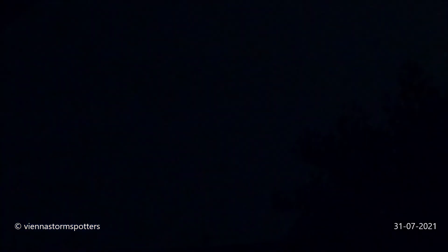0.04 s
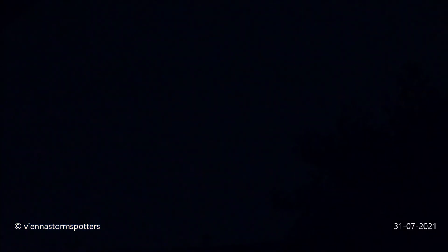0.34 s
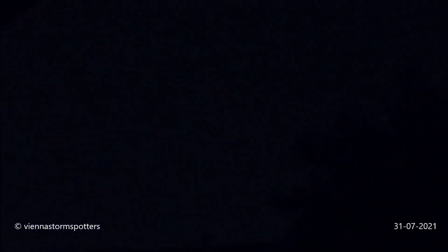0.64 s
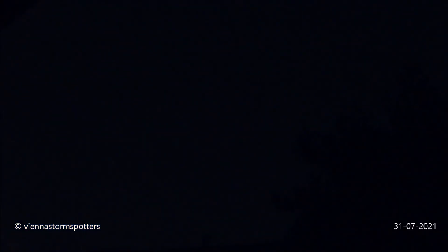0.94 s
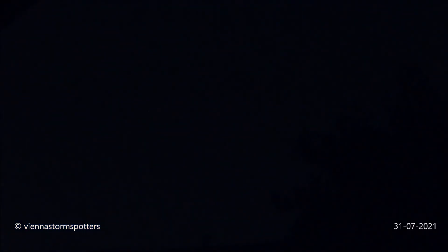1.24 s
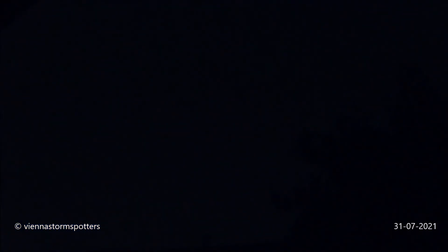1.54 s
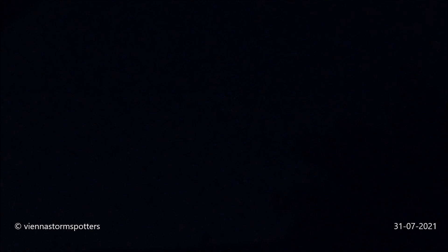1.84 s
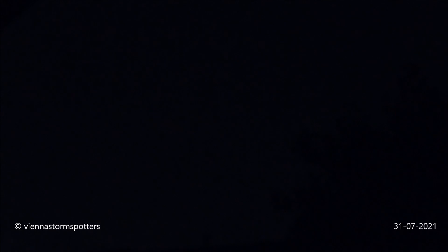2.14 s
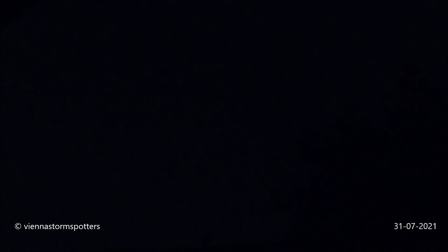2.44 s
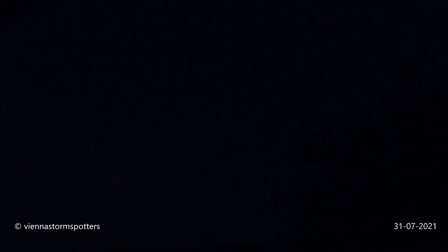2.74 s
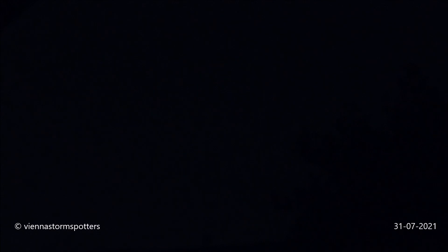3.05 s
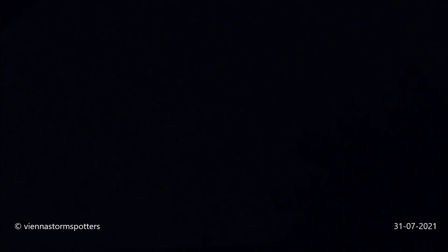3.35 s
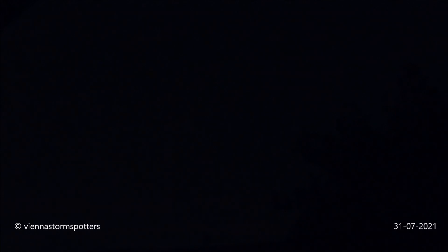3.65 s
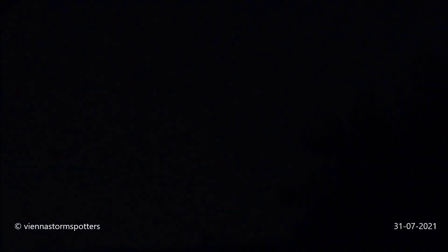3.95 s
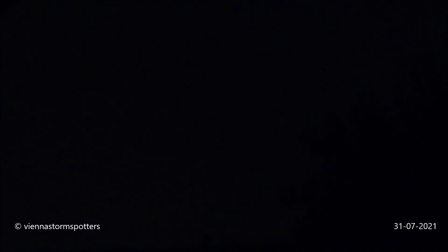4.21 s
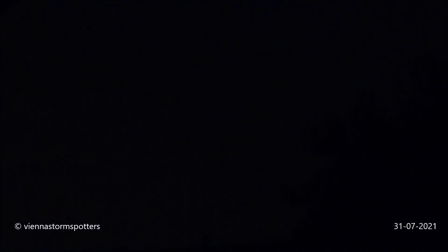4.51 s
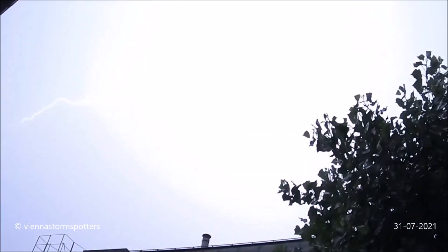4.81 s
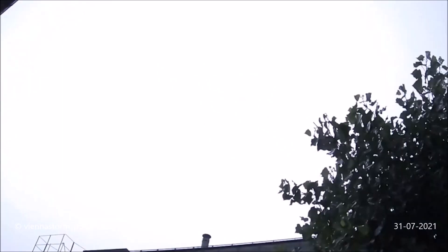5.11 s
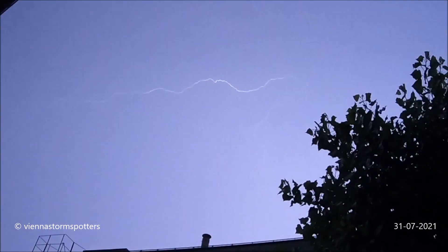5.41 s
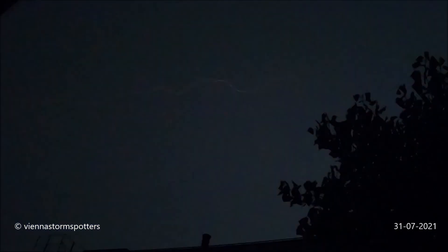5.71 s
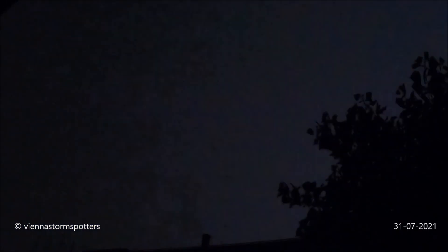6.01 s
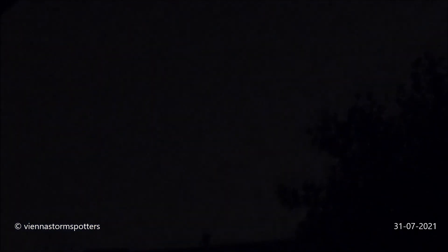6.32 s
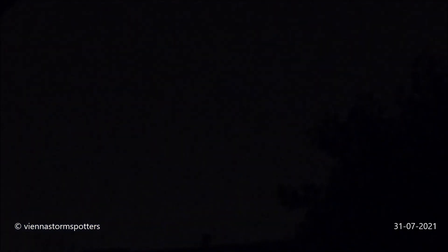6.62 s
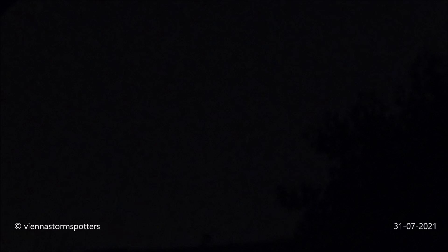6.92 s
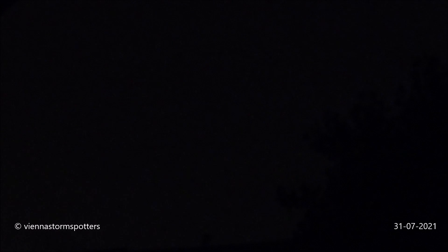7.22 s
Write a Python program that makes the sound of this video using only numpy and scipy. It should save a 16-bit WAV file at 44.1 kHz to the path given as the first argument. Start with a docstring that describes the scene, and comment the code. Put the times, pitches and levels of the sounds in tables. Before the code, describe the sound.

Steady rain hisses softly in a courtyard as a low rumble and two dull claps open. Dry cracks and a tearing rattle build into a very loud peal of thunder that rings between the house walls. The small stereo recorder clicks briefly with overload, dips in level and slowly recovers, while the thunder rolls on in deep, fading waves.

```python
"""Thunder over a courtyard at night, in steady rain, heard on a small two-microphone recorder.
A low rumble and two dull claps open. The nearest branches of the lightning crack and tear from about
1.5 s, the main channel arrives as a loud peal near 3 s, and its far parts roll on in waves.
Every bend of the channel sends one shock, and the house walls ring with them.
The recorder clicks with overload at the peal, turns itself down and slowly recovers."""
import sys
import numpy as np
from scipy import signal
from scipy.fft import rfft, irfft
from scipy.io import wavfile
from scipy.ndimage import uniform_filter1d

SR = 44100
rng = np.random.default_rng(int(sys.argv[2]) if len(sys.argv) > 2 else 0)


def output_pcm(signal):
    """Save a mono or channel-first signal as 16-bit PCM at the path in sys.argv[1].

    Samples are clipped to [-1, 1] before scaling.
    """
    pcm = np.clip(np.atleast_2d(signal).T, -1, 1) * 32767
    wavfile.write(sys.argv[1], SR, np.round(pcm).astype(np.int16))


N = 320250
TAPS = 16384  # length of the filters and echo tails
TIME = np.arange(N) / SR
HZ = np.maximum(np.arange(TAPS // 2 + 1) * SR / TAPS, 1)


def undb(db):
    """Decibels to gain."""
    return 10 ** (np.asarray(db) / 20)


def curve(table):
    """Gain over time from rows of time_s, level_db."""
    rows = np.array(table)
    return undb(np.interp(TIME, rows[:, 0], rows[:, 1]))


def spectrum(table, column=1):
    """Response in dB from one column of a table whose rows begin with frequency_hz."""
    rows = np.array(table)
    return np.interp(np.log(HZ), np.log(rows[:, 0]), rows[:, column])


def below(hz):
    """Steep low-pass response in dB."""
    return -10 * np.log10(1 + np.minimum(HZ / hz, 3) ** 12)


def above(hz):
    """Steep high-pass response in dB."""
    return -10 * np.log10(1 + np.minimum(hz / HZ, 3) ** 12)


def colour(x, response_db):
    """Causal filter: resonances ring after each blow and are already ringing at the start."""
    cepstrum = irfft(np.log(undb(response_db)))
    cepstrum[1:TAPS // 2] *= 2  # fold to minimum phase
    cepstrum[TAPS // 2 + 1:] = 0
    impulse = irfft(np.exp(rfft(cepstrum)))
    return signal.oaconvolve(np.pad(x, (TAPS - 1, 0), "wrap"), impulse, "valid")


def steady(x, span_s):
    """Hold the rms at 1 over span_s and keep the faster grain."""
    size = max(int(span_s * SR), 2)
    power = uniform_filter1d(uniform_filter1d(x ** 2, size), size)
    return x / np.sqrt(np.maximum(power, 1e-18))


def arrivals(per_s, spread_db):
    """Impulses at random moments; most are of like size, a few stray far from it."""
    hit = rng.random(N) < per_s / SR
    size = undb(spread_db * np.minimum(rng.exponential(size=N), 4))
    return hit * size * rng.choice([-1, 1], N)


def swarm(response_db, gain, per_s, spread_db, span_s):
    """Countless overlapping impulses: head-on in the first row, off the side walls in the second."""
    rows = [colour(arrivals(per_s, spread_db), response_db) for _ in range(2)]
    return gain * np.array([steady(row, span_s) for row in rows])


def rain():
    """A wash of distant drops on roofs and leaves, with a few ticks nearer the microphones."""
    # tone of the rain hiss, with the recorder's treble falling away above 10 kHz: frequency_hz, gain_db
    hiss_tone = [(60, 3.5), (250, -1), (450, -2.5), (650, 2.5), (1000, -1.5), (1600, -6.5), (2400, -11),
                 (3200, -15.5), (4500, -21), (7000, -24), (9000, -25.5), (10100, -27.5), (11400, -43.5),
                 (14000, -45.5), (16000, -71)]
    # the rain slowly thickens: time_s, level_db
    rainfall = [(0, -35.5), (2.5, -34.5), (4.5, -35), (6.3, -34), (7.26, -34)]
    tone, gain = spectrum(hiss_tone), curve(rainfall)
    wash = swarm(tone, gain, per_s=16000, spread_db=2, span_s=0.34)
    ticks = swarm(tone + above(3500), gain * undb(-33), per_s=270, spread_db=2.5, span_s=0.8)
    return wash + ticks


def yard():
    """Response in dB of the space between the house walls."""
    # resonances and dips: pitch_hz, width_hz, gain_db
    modes = [(50.3, 9.4, 14), (73.7, 7.5, 6.5), (93.7, 11, -3.5), (110.4, 6.7, 13.5), (135.5, 12.7, 8.5),
             (184.9, 46, 9.5), (224.3, 16.6, 9.5), (261.4, 21, 6.5), (330.3, 24, 3.5), (412.2, 9.8, 9),
             (455.7, 24, 6.5), (593.5, 48, 6), (738, 24, 1), (870, 7.7, -0.5), (970, 12, -1),
             (1313, 39, -3)]
    return sum(db * 2 ** -((2 * (HZ - hz) / width) ** 2) for hz, width, db in modes)


def far_tone():
    """Response in dB for a distant shock ringing in the yard: mostly bass."""
    # tone of the boom: frequency_hz, gain_db
    boom_tone = [(12, -25), (22, -1), (31, -27), (43, 0.5), (70, 4), (130, 1.5), (200, -1.5), (290, -5),
                 (390, -9), (600, -28), (1200, -68.5), (3000, -95.5)]
    return spectrum(boom_tone) + yard()


def near_tone():
    """Response in dB for a nearer shock ringing in the yard: mostly midrange."""
    # tone of the rattle: frequency_hz, gain_db
    rattle_tone = [(150, -45.5), (350, -8), (520, 3.5), (680, 4.5), (920, 1.5), (1300, -7.5), (1900, -19),
                   (3000, -49), (6000, -59.5), (12000, -87.5)]
    return spectrum(rattle_tone) + yard()


def roll(crest_s, level_db, swell_db_per_s, fade_db_per_s):
    """Gain of the unbroken roll: it grows until most of the channel is heard, then recedes."""
    before, after = np.maximum(crest_s - TIME, 0), np.maximum(TIME - crest_s, 0)
    return undb(level_db - swell_db_per_s * before - fade_db_per_s * after)


def surge(start_s, rise_s, hold_s, fade_db_per_s):
    """Gain of one wave of thunder: rise, hold, fade."""
    age = TIME - start_s
    return np.clip(age / rise_s, 0, 1) * undb(-fade_db_per_s * np.maximum(age - rise_s - hold_s, 0))


def thunder_gains():
    """Gains of the deep, chest, middle and rattle registers; waves and roll add in power."""
    # the roll in each register: crest_s, level_db, swell_db_per_s, fade_db_per_s
    deep_roll = (3.0, -25, 4, 2)
    chest_roll = (3.5, -21.5, 9.5, 4)
    middle_roll = (3.5, -22, 6.5, 3.5)
    rattle_roll = (3, -21, 16.5, 4.5)
    # one wave for each stretch of the channel: start_s, rise_s, hold_s, fade_db_per_s, middle_db,
    # then, relative to the middle: deep_db, chest_db, rattle_db
    waves = [(-0.05, 0.023, 0.11, 45, -18, -3, -8, -23.5), (0.123, 0.028, 0.35, 19, -26, 1.5, 5, -17),
             (1.375, 0.052, 0.48, 13, -40.5, -1.5, -8, 3), (1.888, 0.015, 0.035, 60, -33.5, 5, 5, -0.5),
             (2.02, 0.015, 0.097, 90, -30, 0, 1, -7), (2.254, 0.022, 0.054, 115, -24.5, -8, -16, -9),
             (2.536, 0.025, 0.074, 26, -34.5, -5, -7, 11), (2.768, 0.007, 0.065, 69, -11, 5.5, -4, -0.5),
             (2.807, 0.035, 0.14, 36.5, -8, 6, -6.5, -1), (3.031, 0.017, 0.023, 87, -4.5, -2, -10.5, -5),
             (3.1, 0.041, 0.068, 61.5, -13, 2, 1, -7), (3.47, 0.0092, 0.11, 127.5, -13, -4, -1.5, -11.5),
             (3.943, 0.0084, 0.041, 69, -12, -2.5, -4, -8.5), (4.049, 0.049, 0.16, 62, -13, 3, 1.5, -6),
             (4.673, 0.18, 0.068, 111, -17.5, 4, 0, -2.5), (5.206, 0.013, 0.056, 44, -24, 3.5, 0.5, -1),
             (5.626, 0.023, 0.08, 82, -26, 2.5, 4.5, -3.5), (5.729, 0.03, 0.055, 64, -24.5, 4, -10, 0.6),
             (5.88, 0.019, 0.082, 68, -30, 6.5, 0.5, -12), (6.17, 0.096, 0.16, 34, -32.5, 8, -0.5, -4),
             (6.407, 0.042, 0.039, 36, -31.5, -5, -13, -3)]
    deep_lag_s = 0.014
    power = np.array([roll(*row) for row in (deep_roll, chest_roll, middle_roll, rattle_roll)]) ** 2
    for start, rise, hold, fade, middle_db, deep_db, chest_db, rattle_db in waves:
        middle = undb(middle_db) * surge(start, rise, hold, fade)
        deep = undb(middle_db + deep_db) * surge(start + deep_lag_s, rise, hold, fade)
        power += np.array([deep, undb(chest_db) * middle, middle, undb(rattle_db) * middle]) ** 2
    return np.sqrt(power)


def boom(deep_gain, chest_gain, middle_gain, rattle_gain):
    """Long shocks from far bends of the channel merge in four low registers."""
    deep_top_hz, chest_top_hz, middle_top_hz = 88.6, 160, 238
    tone = far_tone()
    chest_tone = tone + above(deep_top_hz) + below(chest_top_hz)
    middle_tone = tone + above(chest_top_hz) + below(middle_top_hz)
    # the upper register follows the rattle about halfway
    upper_gain = undb(0.46) * middle_gain * (rattle_gain / middle_gain) ** 0.49
    deep = swarm(tone + below(deep_top_hz), deep_gain, per_s=160, spread_db=3, span_s=0.071)
    chest = swarm(chest_tone, chest_gain, per_s=300, spread_db=2, span_s=0.17)
    middle = swarm(middle_tone, middle_gain, per_s=400, spread_db=1.5, span_s=0.064)
    upper = swarm(tone + above(middle_top_hz), upper_gain, per_s=600, spread_db=3, span_s=0.07)
    return deep + chest + middle + upper


def rattle(gain):
    """Shocks from nearer bends of the channel crowd into a hard rattle."""
    return swarm(near_tone(), gain, per_s=1500, spread_db=2, span_s=0.04)


def shocks(table, response_db):
    """N-shaped pressure waves, rounded by the air and ringing in the yard."""
    out, t = np.zeros(N), TIME[:TAPS // 16]
    impulse = colour(signal.unit_impulse(TAPS), response_db)
    for start_s, peak_db, length_s in table:
        n_wave = (1 - 2 * t / length_s) * (t < length_s)
        ringing = signal.fftconvolve(n_wave, impulse)[:TAPS]
        start = int(start_s * SR)
        out[start:start + TAPS] += (undb(peak_db) * ringing / np.abs(ringing).max())[:N - start]
    return out


def echoes(decay_s):
    """A dense fading cluster of reflections with unit energy."""
    tail = rng.standard_normal(TAPS) * np.exp(-TIME[:TAPS] / decay_s)
    return tail / np.linalg.norm(tail)


def reflected(direct, echo_db, side_db, decay_s):
    """A blow and its echoes: head-on in the first row, off the side walls in the second."""
    front, side = (signal.oaconvolve(direct, echoes(decay_s))[:N] for _ in range(2))
    return np.array([direct + undb(echo_db) * front, undb(side_db) * side])


def claps():
    """Heavy single shocks, each a dull body with a sharp front."""
    # pressure waves: start_s, body_peak_db, length_s
    blows = [(0.074, -15.5, 0.0036), (0.185, -14.5, 0.0042), (2.766, -5.5, 0.0017), (2.773, 0, 0.0027),
             (2.781, 0, 0.0034), (2.82, 6.5, 0.0017), (2.847, 6.5, 0.0032), (2.859, 6.5, 0.0038),
             (2.889, 6.5, 0.0029), (2.898, -2, 0.005), (2.914, 1, 0.0047), (2.95, 6.5, 0.003),
             (2.994, 6.5, 0.0045), (3.043, 7.5, 0.0017), (3.063, 10.5, 0.0036), (3.081, 8.5, 0.0025),
             (3.096, 6.5, 0.0038), (3.123, 0.5, 0.0097), (3.161, 2, 0.0054), (3.467, 5.5, 0.0039),
             (3.496, -3.5, 0.003), (3.504, 0.5, 0.0054), (3.532, -6, 0.0059), (3.585, 0, 0.0031),
             (3.953, -6, 0.0048), (3.967, 4.5, 0.0033), (3.993, 0, 0.0042), (4.004, 1.5, 0.0033),
             (4.083, -4, 0.004), (4.099, 5, 0.0035), (4.119, 2, 0.0041), (4.155, -0.5, 0.0044),
             (4.216, -10, 0.0038), (4.269, -7, 0.0077), (4.832, -2, 0.0024), (4.87, -3, 0.0018),
             (4.885, -9, 0.0022), (5.229, -9, 0.0019), (5.267, -5, 0.00084), (5.669, -9, 0.0041),
             (5.705, -5.5, 0.0064), (5.721, -8, 0.0043)]
    # after the nearest branch is heard, sound comes from further off and loses treble to the air
    nearest_s, absorb_db_per_s, front_db = 1.5, 4.5, -9
    front_gain = undb(front_db - absorb_db_per_s * np.maximum(TIME - nearest_s, 0))
    direct = shocks(blows, far_tone()) + front_gain * shocks(blows, near_tone())
    return reflected(direct, echo_db=-11, side_db=-3, decay_s=0.039)


def cracks():
    """Short shocks stand out as single dry cracks, most of them ahead of the peal."""
    # pressure waves: start_s, peak_db, length_s
    blows = [(1.457, -15, 0.00039), (1.595, -15, 0.0009), (1.618, -18, 0.0012), (1.957, -13.5, 0.00062),
             (1.999, -11.5, 0.00079), (2.138, -19, 0.001), (2.292, -15, 0.00086), (2.33, -15, 0.0012),
             (2.433, -15, 0.001), (2.549, -12, 0.0012), (2.583, -16, 0.0014), (2.68, -15, 0.0013),
             (5.644, -15, 0.00063)]
    direct = shocks(blows, near_tone() + above(616))
    return reflected(direct, echo_db=-4, side_db=1.5, decay_s=0.022)


def tear():
    """Fine tearing from the nearest branches, whose treble the air has not yet absorbed."""
    # tone of the tearing: frequency_hz, gain_db
    tear_tone = [(400, -33.5), (1000, 10), (1500, 7), (2000, 2.5), (2450, 0.5), (3200, -11), (4500, -21.5),
                 (8000, -42.5), (14000, -55)]
    # its rise to the peal and its retreat: time_s, relative_db
    swell = [(0.0, -58), (0.9, -53), (1.4, -47.5), (1.98, -37.5), (2.25, -38.5), (2.75, -35.5), (2.86, -26),
             (3.09, -23), (3.3, -33), (3.8, -36.5), (4.17, -35), (4.65, -49), (5.3, -42.5), (7.26, -59)]
    return swarm(spectrum(tear_tone), curve(swell) * undb(2), per_s=2500, spread_db=-1, span_s=0.15)


def overload_clicks():
    """Brief bright clicks of the recorder overloading at the loudest part of the peal."""
    # clicks at set moments: start_s, peak_db
    moments = [(2.85, -26), (2.86, -27), (2.89, -25), (2.951, -26.5), (3.046, -26), (3.072, -27),
               (3.084, -24.5), (3.1, -26.5)]
    # their tone: frequency_hz, gain_db
    click_tone = [(1000, -11), (2500, 1.5), (4000, 1), (8000, -10), (14000, -22)]
    clicks = np.zeros(N)
    for start_s, peak_db in moments:
        clicks[int(start_s * SR)] += undb(peak_db)
    tone = spectrum(click_tone)
    unit_peak = np.abs(colour(signal.unit_impulse(TAPS), tone)).max()
    return np.array([colour(clicks, tone) / unit_peak, np.zeros(N)])


def microphones(direct, diffuse):
    """Long waves reach both microphones alike; short ones differ and mostly favour the left."""
    # stereo image of the pair: frequency_hz, side_minus_mid_db, left_minus_right_db
    pair = [(110, -42, -0.45), (200, -38, 0), (340, -16.5, -0.2), (520, -12.5, 0), (760, -2.5, 4.6),
            (1400, -1.2, 4.5), (2400, -3.3, 2.8), (3500, -6.5, 1), (5000, -2.3, 1), (7000, 1, -1.6),
            (12000, 0.7, 0.5)]
    side = colour(diffuse, spectrum(pair))
    lean_db = spectrum(pair, column=2) / 2
    # small surfaces near the microphones reflect only the short waves and ripple their spectrum
    comb = np.abs(1 + undb(-9.5) * rfft(echoes(decay_s=0.06)))
    ripple_db = 20 * np.log10(comb + 1e-3) * undb(above(680))
    left = colour(direct + side, ripple_db + lean_db)
    right = colour(direct - side, ripple_db - lean_db)
    return np.array([left, right])


def scene():
    """Thunder, rain and the recorder's clicks in stereo, eased in and out over a few milliseconds."""
    deep_gain, chest_gain, middle_gain, rattle_gain = thunder_gains()
    thunder = rattle(rattle_gain) + tear() + claps() + cracks()
    thunder += boom(deep_gain, chest_gain, middle_gain, rattle_gain)
    direct, diffuse = signal.windows.tukey(N, 0.002) * (thunder + rain() + overload_clicks())
    return microphones(direct, diffuse)


def gain_control(x, limit_db, recovery_db_per_s, sense_s, attack_s, hold_s):
    """The recorder turns down quickly when the level passes the limit, holds, and creeps back up."""
    power = uniform_filter1d(np.mean(x ** 2, axis=0), int(sense_s * SR))
    over_db = np.maximum(10 * np.log10(np.maximum(power, 1e-12)) - limit_db, 0)
    creep_db = recovery_db_per_s * TIME
    cut_db = np.maximum.accumulate(over_db + creep_db) - creep_db
    held_db = np.maximum(cut_db, np.interp(TIME - hold_s, TIME, cut_db))
    pole = np.exp(-1 / (attack_s * SR))
    return x * undb(-signal.lfilter([1 - pole], [1, -pole], held_db))


def record(dry):
    """The recorder ducks thunder and rain together, clips the tallest peaks and cuts the top treble."""
    ducked = gain_control(dry, limit_db=-7, recovery_db_per_s=3.5,
                          sense_s=0.09, attack_s=0.0078, hold_s=0.082)
    top_cut = signal.ellip(8, 0.2, 70, 15500, fs=SR, output="sos")
    return signal.sosfilt(top_cut, np.clip(ducked, -1, 1))


dry = scene()
out = record(dry)
output_pcm(out)
```